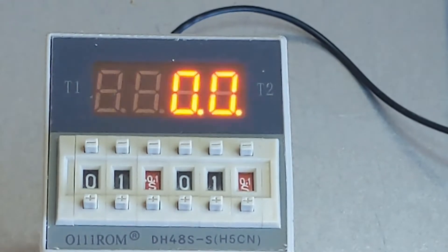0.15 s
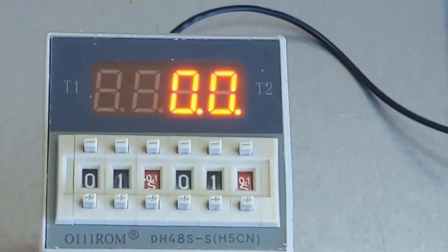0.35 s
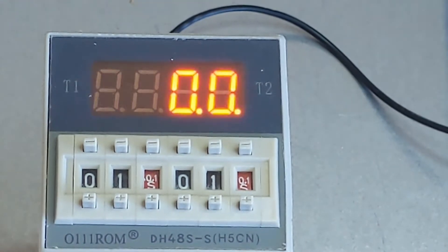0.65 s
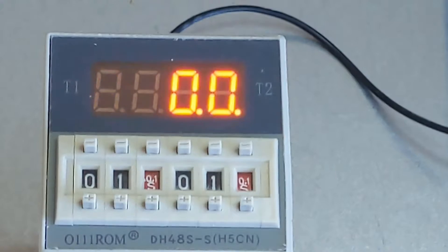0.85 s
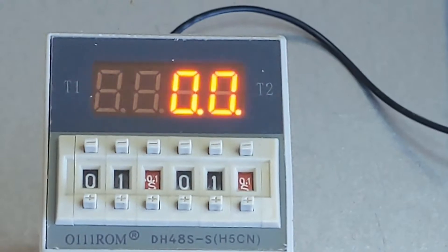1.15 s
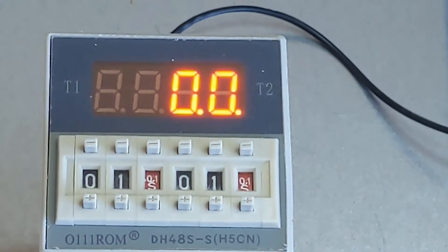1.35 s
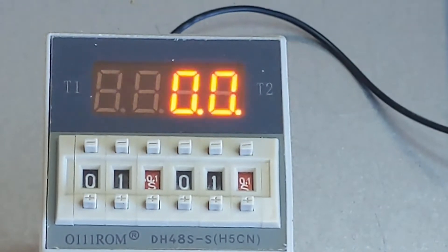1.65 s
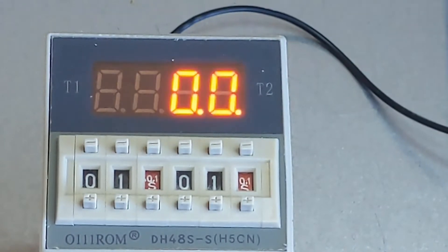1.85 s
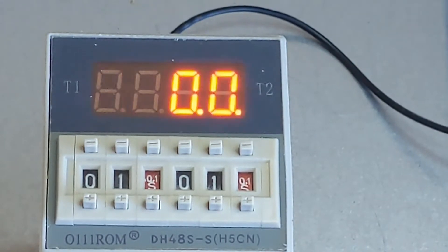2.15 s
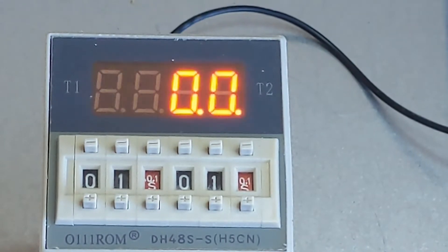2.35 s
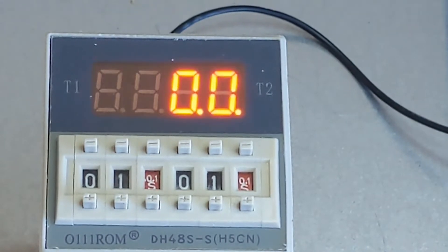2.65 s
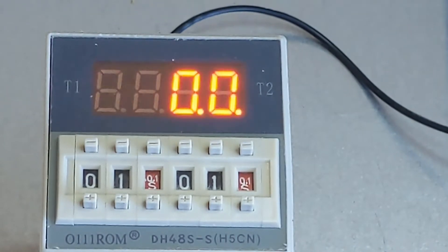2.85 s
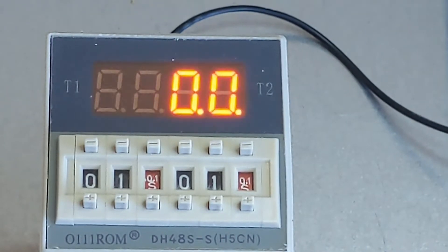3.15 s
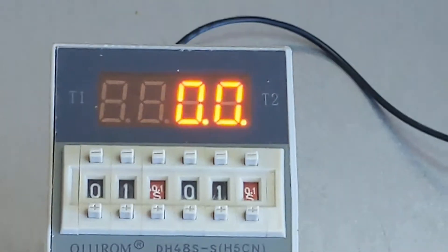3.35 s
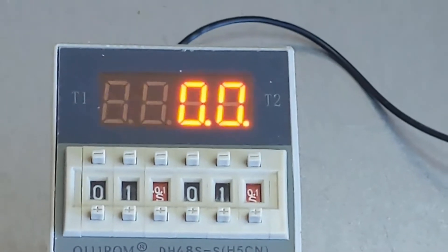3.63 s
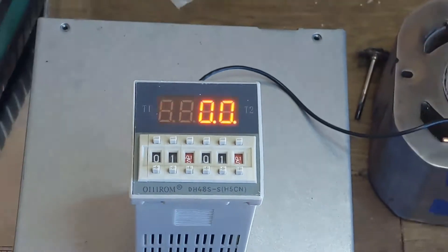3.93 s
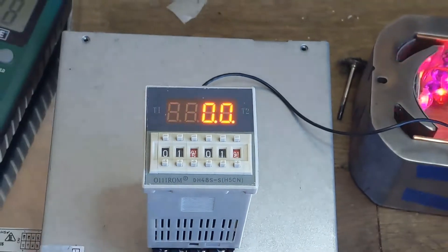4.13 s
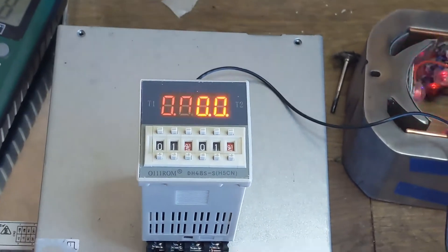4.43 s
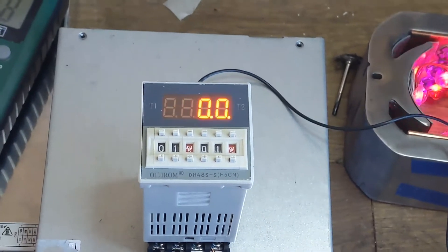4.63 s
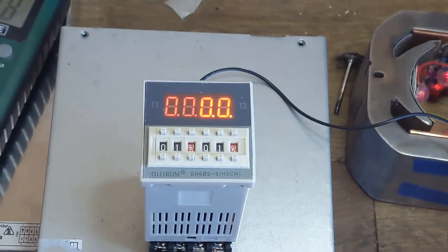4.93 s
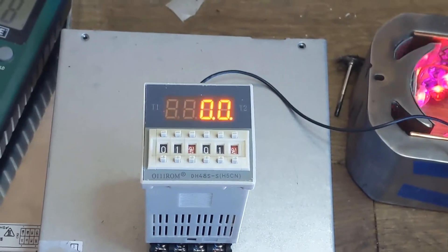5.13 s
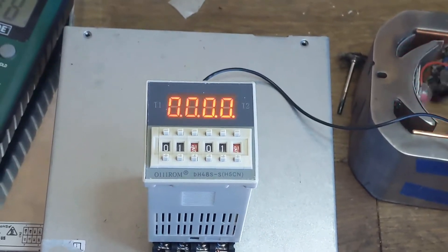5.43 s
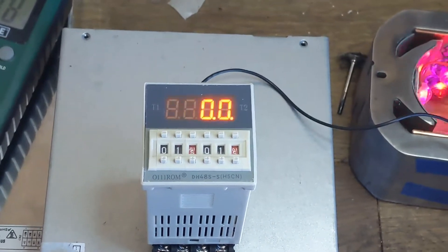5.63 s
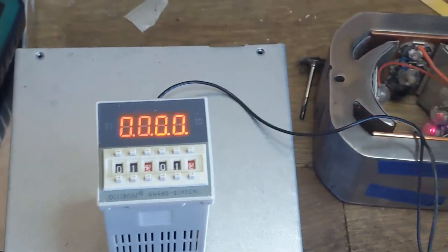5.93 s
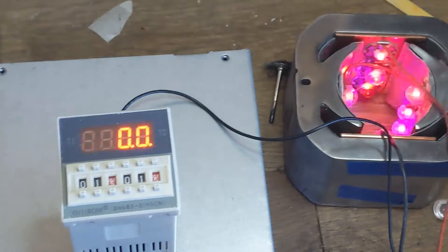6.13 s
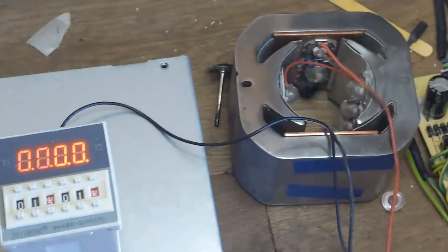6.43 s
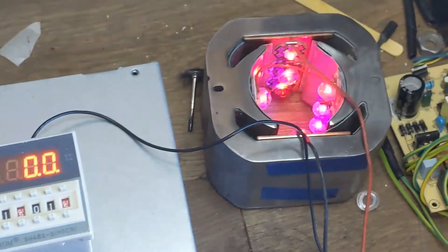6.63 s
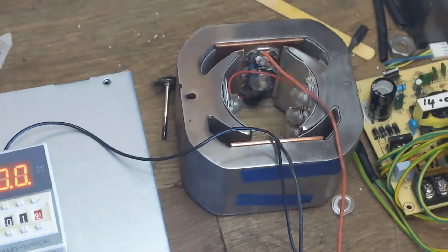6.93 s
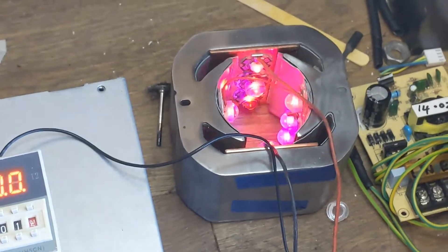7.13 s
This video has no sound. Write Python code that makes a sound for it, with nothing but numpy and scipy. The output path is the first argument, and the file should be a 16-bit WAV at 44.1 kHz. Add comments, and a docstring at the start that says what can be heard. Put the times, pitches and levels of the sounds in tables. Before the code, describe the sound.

A timer relay clicks on and off close by, about six times a second, without a break. Each bright metallic snap is followed by a softer tick with a light plastic knock. A fan hums faintly underneath, and one brief, bright hiss sounds a little before the middle. The small workshop adds short echoes, and the hand-held microphone picks up low rumble and a few soft bumps.

```python
"""A timer relay on a sheet-metal plate clacks in and out six times a second in a small workshop.
Each blow rings its armature and case: a bright snap on the pull-in, a softer tick on the drop-out.
Bench and walls answer with a row of echoes and a short tail that shift as the hand-held phone moves.
Underneath, a fan hums, the hand rumbles and bumps on the phone, and one brief, bright hiss rings out."""
import sys
import numpy as np
from scipy import signal
from scipy.fft import rfft, irfft, next_fast_len
from scipy.io import wavfile
from scipy.ndimage import uniform_filter1d, map_coordinates

SR = 44100
rng = np.random.default_rng(int(sys.argv[2]) if len(sys.argv) > 2 else 0)


def put_to_file(sound):
    """Save the sound as 16-bit audio at rate SR, in the file named by the first command-line argument."""
    columns = np.atleast_2d(sound).T  # one column per channel
    safe = np.clip(columns, -1, 1)
    whole_steps = np.round(safe * 32767)
    wavfile.write(sys.argv[1], SR, whole_steps.astype(np.int16))


N = 321030

# colour of the fan's air (frequency [Hz], level [dB])
FAN_COLOUR = [(53, -35), (90, -24.5), (288, -12), (759, -10), (1480, -11.5), (1800, -19.5), (2330, -22),
              (3080, -21), (3510, -16.5), (7610, -31), (8120, -23), (8850, -28), (15500, -42)]
# duct resonances (frequency [Hz], width [Hz], level [dB])
DUCT_MODES = [(610, 126, 8.5), (719.6, 28, 15), (897, 7.7, 0), (1440, 52, 6)]
# stereo image of the noises (frequency [Hz], left-right correlation)
NOISE_IMAGE = [(40, 0.97), (125, 0.9), (300, 0.46), (1000, 0.37), (2500, 0.0047), (10000, 0.05)]
# swells of the hand rumble (time [s], level [dB])
GRIP_LEVEL = [(0.0, -47), (0.2, -44.5), (0.4, -52.5), (0.75, -45), (0.87, -44), (1.07, -53), (1.95, -57.5),
              (2.2, -56), (3.4, -56.5), (3.95, -60), (4.4, -54.5), (4.6, -63), (4.76, -43.5), (4.95, -52),
              (5.6, -54.5), (6.14, -58), (7.28, -55.5)]
# colour of the hand rumble (frequency [Hz], level [dB])
GRIP_COLOUR = [(15, 10.5), (30, 5.5), (75, -11.5), (130, -15.5), (300, -63.5)]
# finger bumps (time [s], level [dB], pitch [Hz], width over pitch)
FINGER_BUMPS = [(0.17, -38, 38.3, 0.5), (0.851, -29.5, 55, 0.28), (.895, -35, 73, 0.52),
                (3.38, -44, 298, 2.4), (4.76, -43, 55, .32), (5.662, -40.5, 292, 1.2)]
# resonances of the brief hiss (frequency [Hz], width [Hz], level [dB])
HISS_MODES = [(119, 48, -8.5), (3020, 660, -11), (3950, 340, -3.5), (5120, 470, 1), (5970, 210, 8),
              (7100, 640, -0.5), (8050, 1100, -1.5), (9600, 2200, -5.5), (11900, 500, -4.5),
              (13900, 850, -5)]
# early echoes off bench and walls (delay [ms], left level [dB], right level [dB])
EARLY_ECHOES = [(1.2, -12, -3), (2.7, -13, -10), (5.1, -4, -3), (7.6, 3, 3), (8.7, -10, -3), (10, -7, -4),
                (11.3, -10, -8), (13.4, -5, -9), (14.4, -1, -8), (16.6, -8, -8), (19.4, -8, -7),
                (23.5, -9, -12), (27.4, -11, -12)]
# room tail (frequency [Hz], time to fall 60 dB [s])
TAIL_DECAY = [(1000, 0.15), (2600, 0.26), (4300, 0.15), (5500, 0.23), (9500, 0.18), (15000, 0.21)]
# colour of the direct path, partly shaded by the case (frequency [Hz], level [dB])
DIRECT_COLOUR = [(650, -4), (1500, 5.5), (2400, -7.5), (4300, -7.5), (5500, -18), (7400, -53), (9500, -3),
                 (12000, -16)]
# direct path as the phone moves (time [s], level [dB])
DIRECT_LEVEL = [(0, 3.5), (2.4, 0), (2.8, 4.5), (4.4, 5.5), (4.8, 1.5), (6, 3), (7.28, -2)]
# pull-in blows (time [s], level [dB])
PULL_INS = [(-0.03, 9.5), (0.1365, 9.5), (0.303, 10), (0.4669, 8.5), (0.6377, 10), (0.8022, 10),
            (0.96, 10.5), (1.1401, 9.5), (1.302, 9), (1.4674, 9.5), (1.6336, 10.5), (1.7961, 10.5),
            (1.962, 10.5), (2.14, 10), (2.302, 9.5), (2.472, 9.5), (2.6263, 9), (2.8019, 10.5),
            (2.9607, 11), (3.1358, 10.5), (3.301, 10), (3.4665, 10), (3.6377, 10), (3.7988, 11.5),
            (3.9563, 10.5), (4.124, 10.5), (4.3029, 9.5), (4.4725, 8.5), (4.6296, 10.5), (4.804, 11),
            (4.9701, 10), (5.1387, 9.5), (5.304, 10.5), (5.4648, 10.5), (5.6239, 10.5), (5.803, 10),
            (5.9598, 11.5), (6.1383, 10.5), (6.3006, 10), (6.4643, 10), (6.6313, 10.5), (6.7991, 10.5),
            (6.9642, 10.5), (7.133, 9)]
# drop-out blows (time [s], level [dB])
DROP_OUTS = [(0.0597, -9.5), (0.2216, -8.5), (0.3922, -8), (0.5572, -9), (0.7249, -10), (0.89, -9),
             (1.0581, -8), (1.2161, -8), (1.388, -7.5), (1.5532, -7), (1.723, -8.5), (1.886, -8.5),
             (2.0535, -7), (2.2267, -8), (2.389, -8), (2.5604, -8.5), (2.718, -11), (2.8953, -12),
             (3.0638, -12), (3.2288, -11), (3.3917, -8.5), (3.554, -9), (3.7246, -10), (3.889, -9),
             (4.0601, -9), (4.2288, -11.5), (4.3931, -9.5), (4.554, -9), (4.7265, -9.5), (4.8929, -8.5),
             (5.0502, -9), (5.2233, -9), (5.39, -9), (5.5576, -10), (5.7285, -11), (5.8922, -9),
             (6.064, -12), (6.218, -9), (6.3872, -9.5), (6.5535, -9), (6.7201, -9), (6.8864, -9.5),
             (7.06, -9.5), (7.2151, -8)]
# armature striking the core (frequency [Hz], width [Hz], level [dB])
CORE_MODES = [(2035, 19, -17.5), (2346, 34.5, -17), (2817, 46, -19.5), (3020, 1870, -30), (4190, 170, -21),
              (4540, 790, -25), (5380, 120, -16.5), (5408, 234, -6.5), (5816, 630, -17.5), (7430, 53, -13),
              (7124, 507, -10.5), (7700, 650, -11.5), (9264, 96, 0.5), (9540, 330, 2.5), (9479, 252, 7),
              (10070, 760, -7), (11580, 110, -5), (11600, 960, -13), (13200, 500, -44), (14300, 1500, -37)]
# armature falling back on its stop (frequency [Hz], width [Hz], level [dB])
STOP_MODES = [(2130, 740, -20), (4230, 99, 3), (4740, 130, -4.5), (5506, 80, 5), (6200, 1100, -15.5),
              (7400, 230, -12.5), (9620, 710, -8.5), (11800, 800, -10.5), (14240, 820, -15.5)]
# knock of the plastic case (frequency [Hz], width [Hz], level [dB])
CASE_MODES = [(557, 243, 0.5), (1141, 47, 3.5), (1425, 83, 5), (1633, 187, 0.5)]
# case knock relative to its drop-out blow (time [s], level [dB])
DROP_KNOCK_LEVEL = [(0, -7), (3.2, -7.5), (3.5, -4), (4.4, -7), (4.8, -6.5), (7.28, -7)]
# balance of the phone's two ports (frequency [Hz], left minus right [dB])
PORT_BALANCE = [(60, -0.5), (110, 2.5), (200, 0), (380, -0.5), (700, 3.5), (1290, -1), (2380, -1),
                (4400, -3.5), (8120, -5), (15000, -7)]


def amp(db):
    """Decibels to gain."""
    return 10 ** (np.asarray(db) / 20)


def unit(x):
    """Scale to rms 1."""
    return x / np.sqrt(np.mean(x ** 2) + 1e-20)


def at_hz(rows, hz):
    """Read (frequency, value) rows on a log axis."""
    freqs, values = np.transpose(rows)
    return np.interp(np.log(hz + 1), np.log(freqs + 1), values)


def at_time(rows, t):
    """Read (time, value) rows as straight ramps."""
    return np.interp(t, *np.transpose(rows))


def filtered(x, response):
    """Shape x with a complex frequency response."""
    size = next_fast_len(x.shape[-1] + 8192)
    return irfft(rfft(x, size) * response(np.fft.rfftfreq(size, 1 / SR)), size)[..., :x.shape[-1]]


def modes(table):
    """Response of a bank of ringing resonances, alternating in polarity."""
    return lambda hz: sum((-1) ** k * amp(db) * 1j * hz * width / (pitch**2 - hz**2 + 1j * hz * width)
                          for k, (pitch, width, db) in enumerate(table))


def wobble(rate):
    """A smooth random curve through rate points a second."""
    points = rng.standard_normal(int(N * rate / SR) + 4)
    return map_coordinates(points, [np.arange(N) * rate / SR])


def stereo_noise(colour):
    """Coloured noise of rms 1, centred in the bass and wide in the treble."""
    def mid_side(hz):
        spread = np.arccos(np.clip(at_hz(NOISE_IMAGE, hz), -1, 1)) / 2
        return colour(hz) * [np.cos(spread), np.sin(spread)]
    mid, side = filtered(rng.standard_normal((2, N)), mid_side)
    return unit(np.array([mid + side, mid - side]))


def fan():
    """A bed of slightly unsteady air, humming at the duct's resonances."""
    air = stereo_noise(lambda hz: amp(at_hz(FAN_COLOUR, hz)) * np.abs(1 + modes(DUCT_MODES)(hz)))
    flutter = amp(.6 * wobble(3) + wobble(12))
    return amp(-51.5) * flutter * air


def hand():
    """The grip rumbles unevenly; each finger bump is a soft push with a short rough tail."""
    grip = amp(at_time(GRIP_LEVEL, np.arange(N) / SR) + 3.2 * wobble(27))
    out = grip * stereo_noise(lambda hz: amp(at_hz(GRIP_COLOUR, hz)))
    t = np.arange(SR // 6) / SR
    for start, db, hz, width in FINGER_BUMPS:
        push = amp(1.5 - 7.7 * t * hz) * np.sin(2 * np.pi * hz * t)
        rough = unit(filtered(rng.standard_normal(len(t)), modes([(hz, width * hz, 0)])))
        envelope = amp(2 - 60 * t / .061) * np.minimum(1, t * hz)
        out[:, round(start * SR):][:, :len(t)] += amp(db) * (push + envelope * rough)
    return out


def ringing_hiss(start_s=2.712, peak_s=2.732, release_s=2.768):
    """One brief, bright, grainy ringing hiss: quick rise, slow sag, then a faster fall."""
    t = np.arange(N) / SR
    grain = amp(2 * wobble(700)) * np.clip((t - start_s) / .0064, 0, 1)
    swell_db = np.minimum(600 * (t - peak_s), -200 * (t - peak_s))
    release_db = -500 * np.clip(t - release_s, 0, None)
    hiss = stereo_noise(lambda hz: np.abs(modes(HISS_MODES)(hz)))
    return amp(-28 + swell_db + release_db) * grain * hiss


def smeared_pulses(delays_ms, smear_ms, count):
    """A stereo pulse per blow and delay; uneven surfaces scatter the arrival of the treble."""
    per_path = .72 * rng.random((len(delays_ms), 1, 26))
    per_blow = .28 * rng.random((count, len(delays_ms), 1, 26))
    per_port = .02 * rng.random((len(delays_ms), 2, 26))
    bands = np.repeat(per_path + per_blow + per_port, 41, axis=-1)
    lag = uniform_filter1d(bands, size=41)[..., :1025]
    hz = np.fft.rfftfreq(2048, 1 / SR)
    arrival_ms = delays_ms[:, None, None] + smear_ms * lag * hz ** 2 / (hz ** 2 + 3000 ** 2)
    return irfft(np.exp(-2j * np.pi * np.cumsum(arrival_ms * SR / 1000, axis=-1) / 2048))


def room_tails(count, likeness, rise_s=.008):
    """A diffuse tail per blow, partly like the one before: it blooms, then dies away band by band."""
    size = SR // 3
    fresh = rng.standard_normal((count, 2, size))
    renewal = np.sqrt(1 - likeness ** 2)
    fresh[0] /= renewal  # the first tail starts at full strength
    drifting = signal.lfilter([renewal], [1, -likeness], fresh, axis=0)
    hz, t, spectrum = signal.stft(drifting, SR, nperseg=256)
    decay = amp(-60 * t / at_hz(TAIL_DECAY, hz)[:, None])
    tails = signal.istft(spectrum * decay, SR, nperseg=256)[1][..., :size]
    return tails * (1 - np.exp(-np.arange(size) / (SR * rise_s)))


def blows_in_room(times, tail_db, smear_ms, likeness, scatter_db):
    """Each blow as a direct pulse, early echoes and a tail, with a second of padding at both ends."""
    count = len(times)
    replies = amp(tail_db) * room_tails(count, likeness)
    delays_ms, *echo_db = np.transpose(EARLY_ECHOES)
    gains = amp(np.transpose(echo_db) + scatter_db * rng.standard_normal((count, len(delays_ms), 2)))
    echoes = smeared_pulses(delays_ms, smear_ms, count)
    replies[..., :2048] += np.einsum("bep,bept->bpt", gains, echoes)  # blow, echo, port, time
    direct, room = np.zeros((2, 2, N + 2 * SR))
    for time, reply, pulse in zip(times, replies, smeared_pulses(np.zeros(1), smear_ms, count)):
        start = round((time + 1) * SR)
        room[:, start:start + reply.shape[-1]] += reply
        direct[:, start:start + 2048] = amp(at_time(DIRECT_LEVEL, time)) * pulse[0]
    return room + filtered(direct, lambda hz: amp(at_hz(DIRECT_COLOUR, hz)))


def held(times, values):
    """Hold each blow's value until just before the next, on the padded timeline."""
    blow = np.searchsorted(times, np.arange(N + 2 * SR) / SR - 1 + .002) - 1
    return np.asarray(values)[np.clip(blow, 0, None)]


def relay_drop_out():
    """The soft tick: the armature falls back, rings on its stop and knocks the case."""
    times, db = np.transpose(DROP_OUTS)
    blows = blows_in_room(times, tail_db=-19.5, smear_ms=2.2, likeness=.6, scatter_db=1.5)
    blows *= amp(held(times, db))
    steel = filtered(blows, modes(STOP_MODES))
    knock = filtered(blows * amp(held(times, at_time(DROP_KNOCK_LEVEL, times))), modes(CASE_MODES))
    return (steel + knock)[:, SR:SR + N]


def relay_pull_in():
    """The bright snap: the armature strikes the core, and steel rings over a light case knock."""
    times, db = np.transpose(PULL_INS)
    blows = blows_in_room(times, tail_db=-20, smear_ms=1.3, likeness=.7, scatter_db=2)
    direct_db = at_time(DIRECT_LEVEL, times)
    # a clearer direct path leans the steel to the right
    balance_db = -.3 * (direct_db - direct_db.mean()) + 1.4 * rng.standard_normal(len(times))
    left_db = held(times, balance_db) / 2
    steel = filtered(blows * amp(held(times, db) + [left_db, -left_db]), modes(CORE_MODES))
    knock = amp(-16.5) * filtered(blows, modes(CASE_MODES))
    return (steel + knock)[:, SR:SR + N]


def scene():
    """The relay up front, over fan, hand and one ringing hiss."""
    return relay_pull_in() + relay_drop_out() + fan() + hand() + ringing_hiss()


def record(dry, roll_off_hz=15500, top_hz=15750):
    """Each of the phone's ports adds its own colour, and the very top rolls off steeply."""
    def response(hz):
        balance = amp(at_hz(PORT_BALANCE, hz) * [[.5], [-.5]])
        high_cut = (hz < top_hz) / (1 + (hz / roll_off_hz) ** 40)
        return balance * high_cut
    return filtered(dry, response)


dry = scene()
out = record(dry)
put_to_file(out)
```